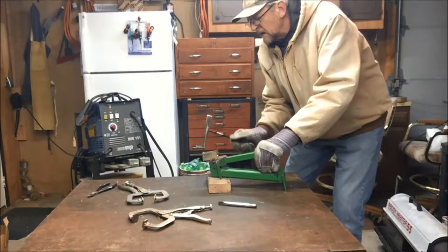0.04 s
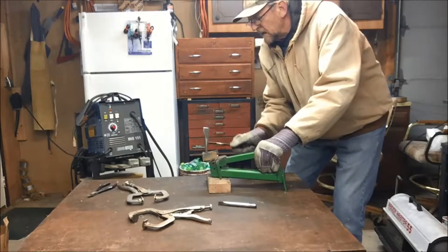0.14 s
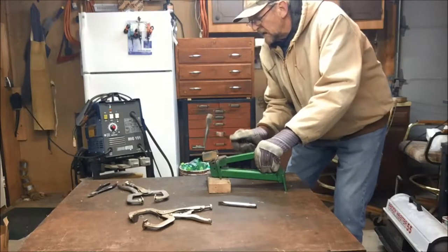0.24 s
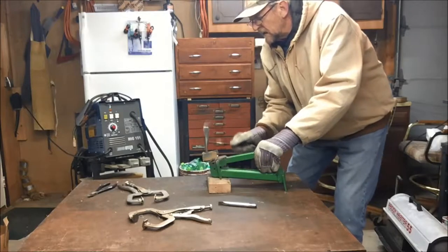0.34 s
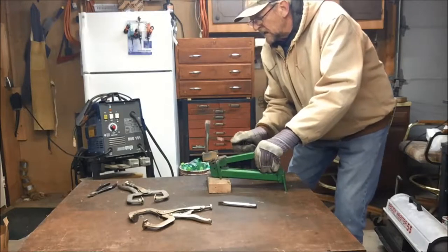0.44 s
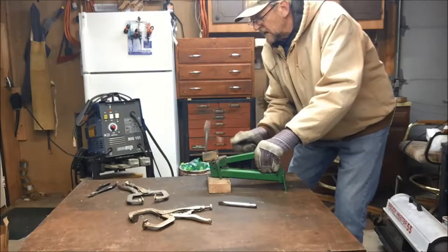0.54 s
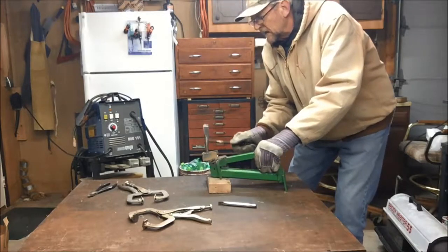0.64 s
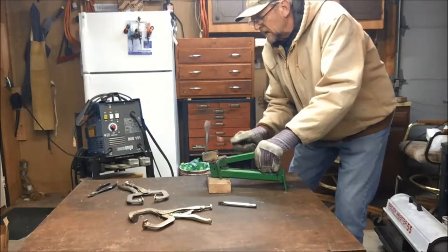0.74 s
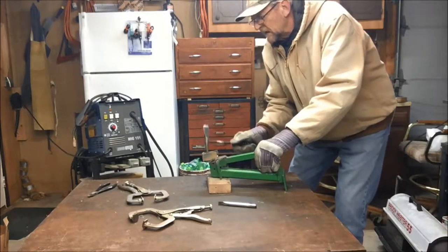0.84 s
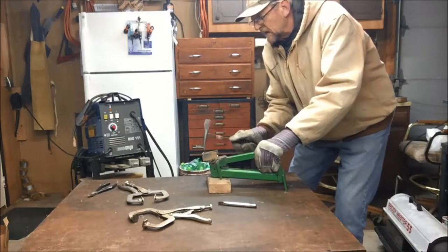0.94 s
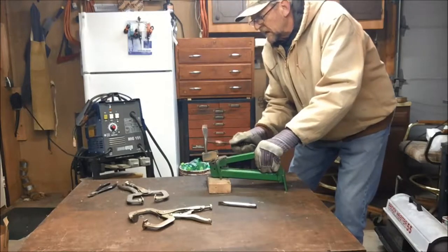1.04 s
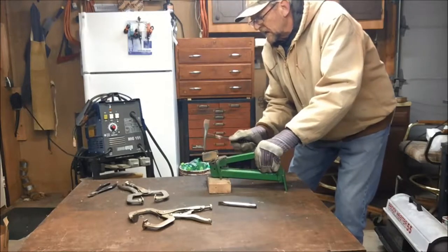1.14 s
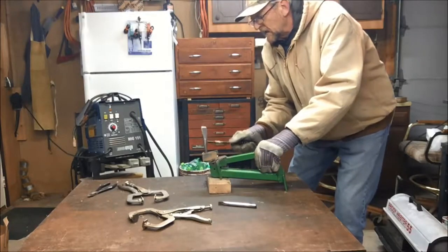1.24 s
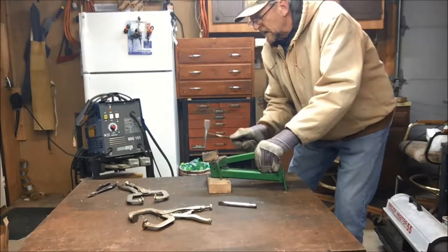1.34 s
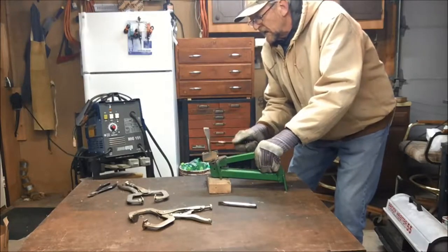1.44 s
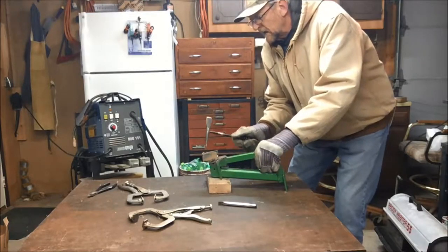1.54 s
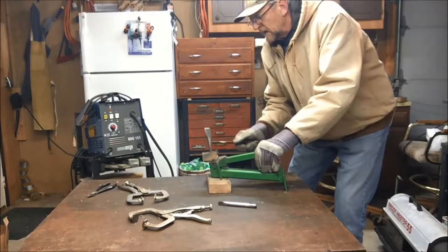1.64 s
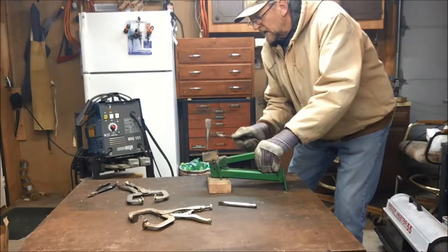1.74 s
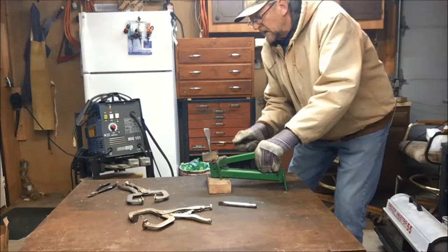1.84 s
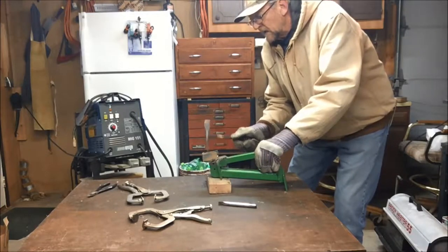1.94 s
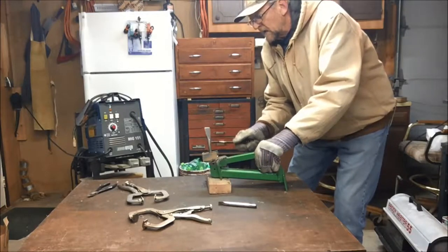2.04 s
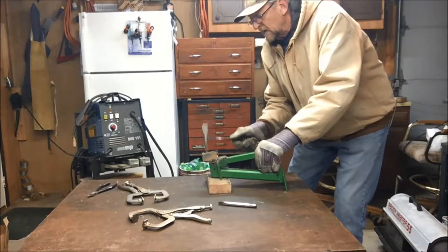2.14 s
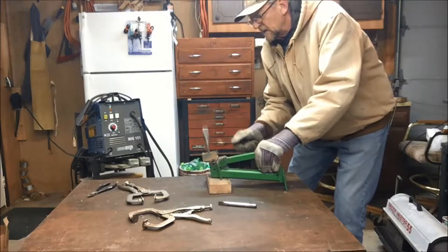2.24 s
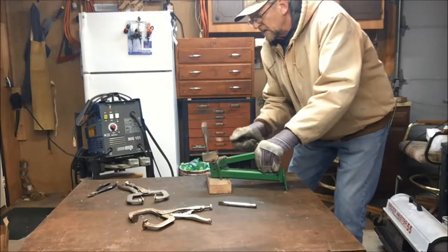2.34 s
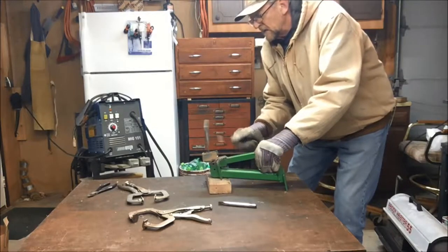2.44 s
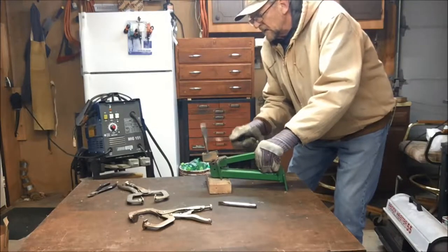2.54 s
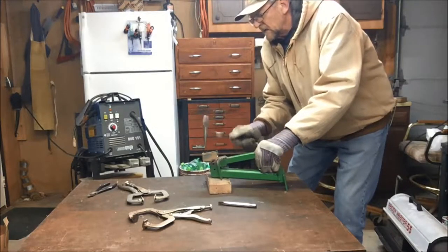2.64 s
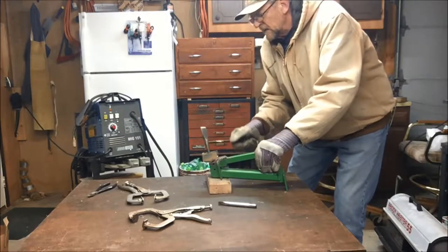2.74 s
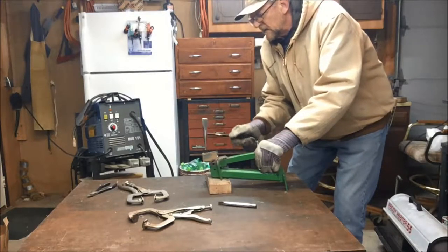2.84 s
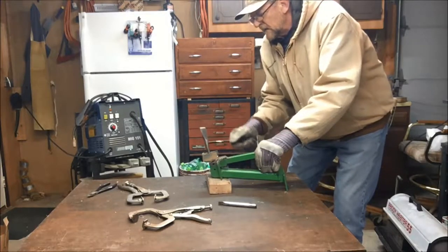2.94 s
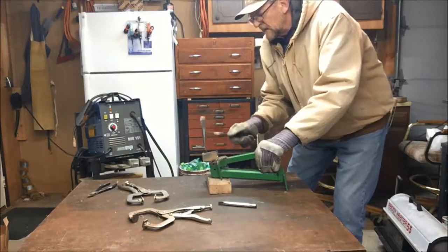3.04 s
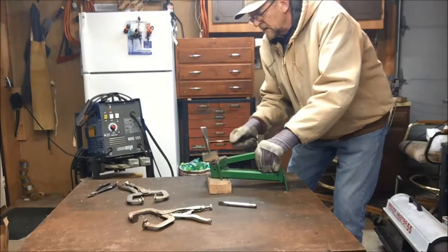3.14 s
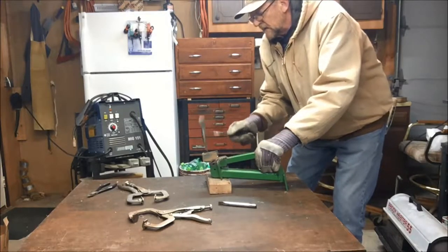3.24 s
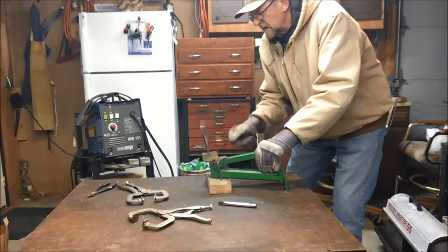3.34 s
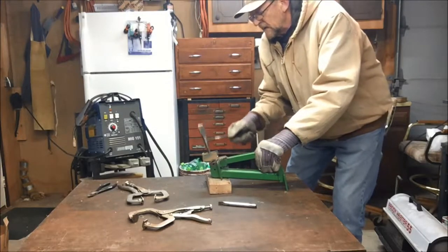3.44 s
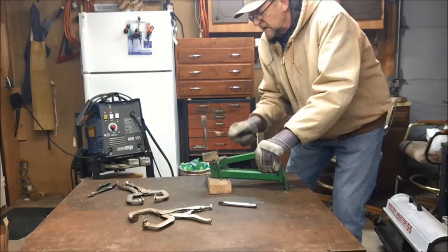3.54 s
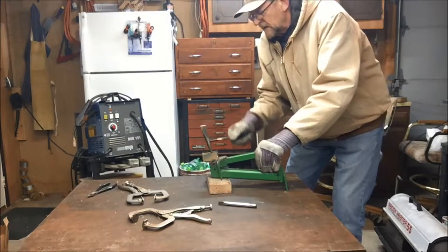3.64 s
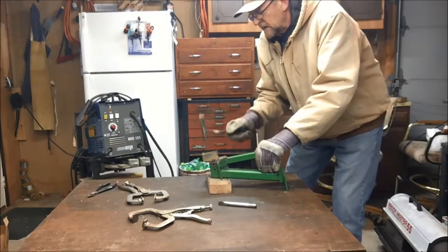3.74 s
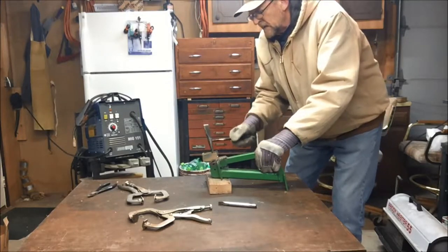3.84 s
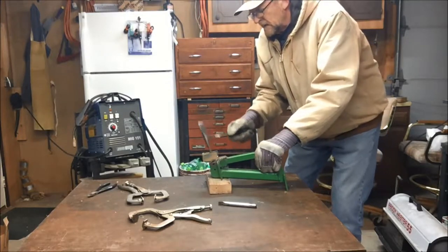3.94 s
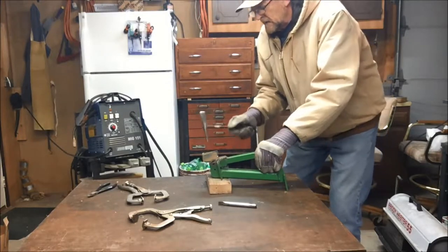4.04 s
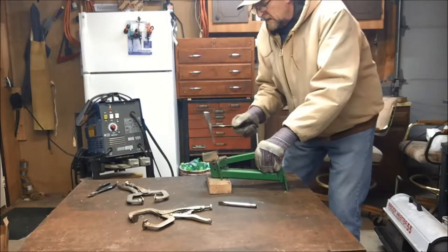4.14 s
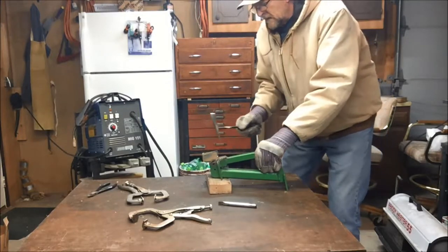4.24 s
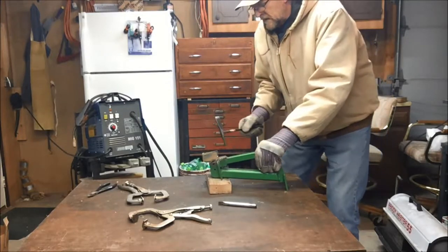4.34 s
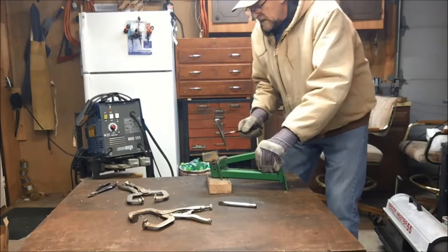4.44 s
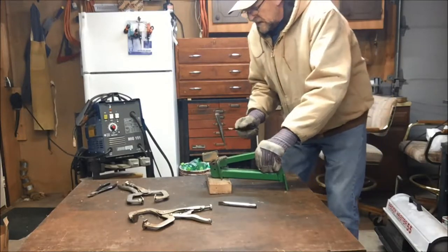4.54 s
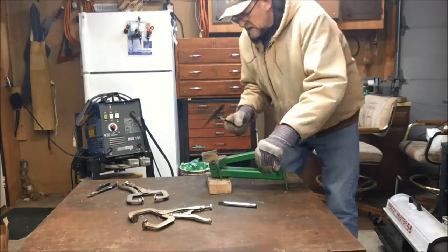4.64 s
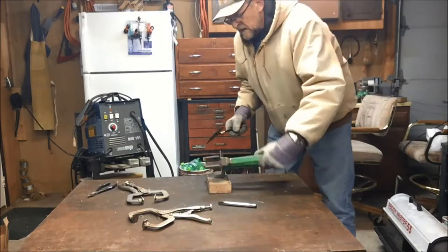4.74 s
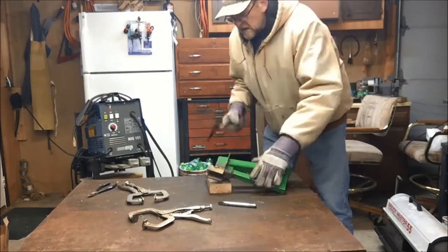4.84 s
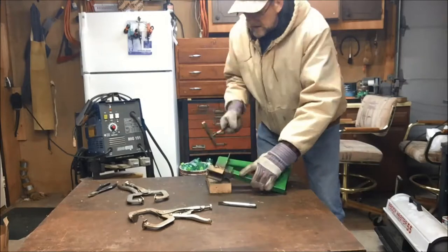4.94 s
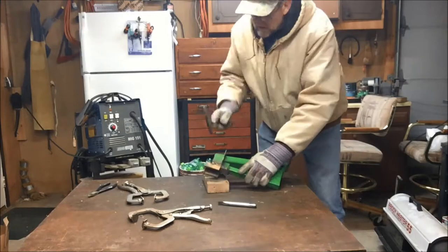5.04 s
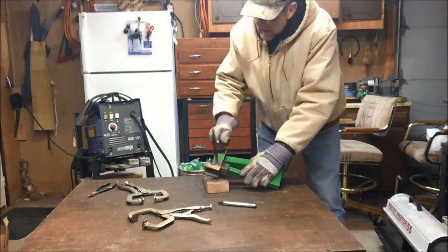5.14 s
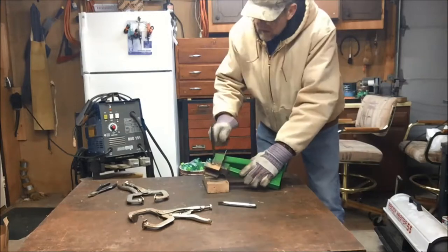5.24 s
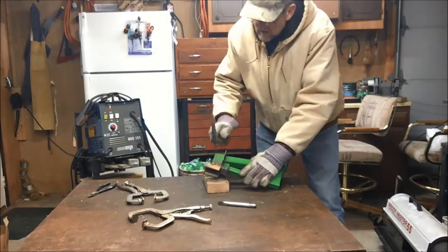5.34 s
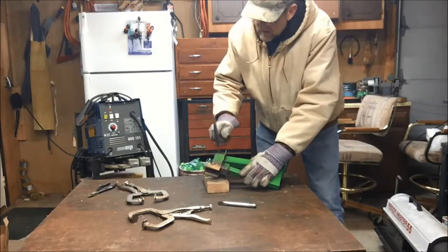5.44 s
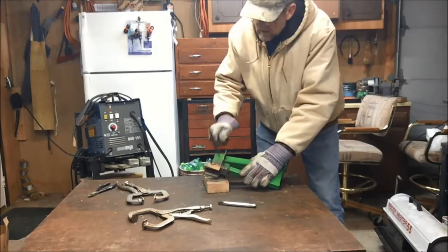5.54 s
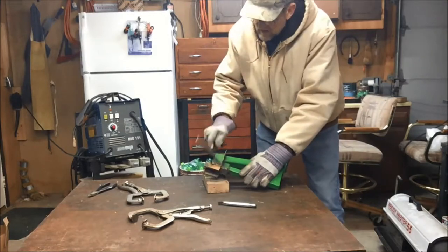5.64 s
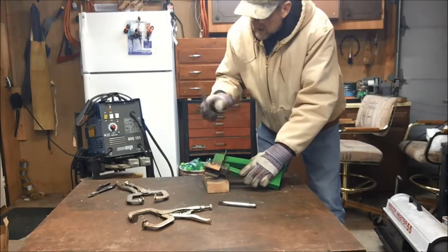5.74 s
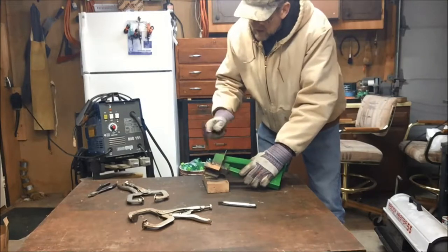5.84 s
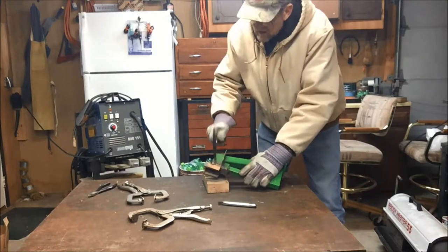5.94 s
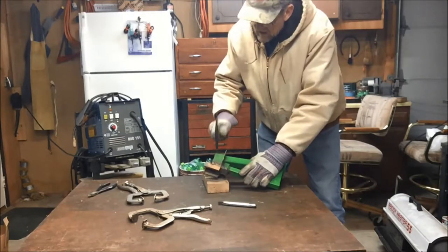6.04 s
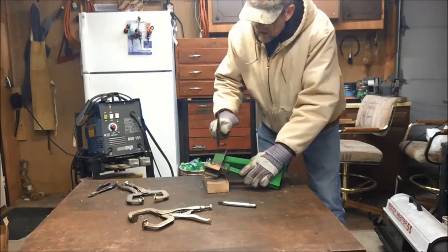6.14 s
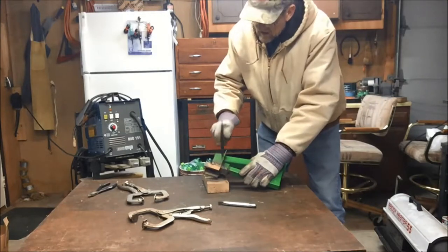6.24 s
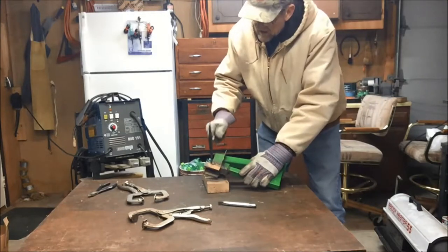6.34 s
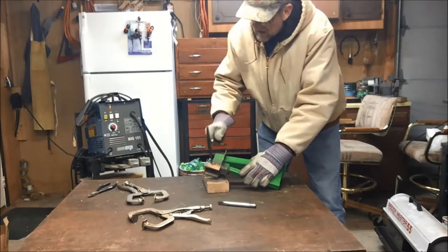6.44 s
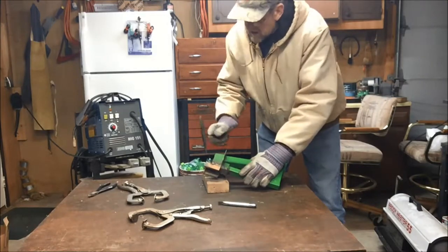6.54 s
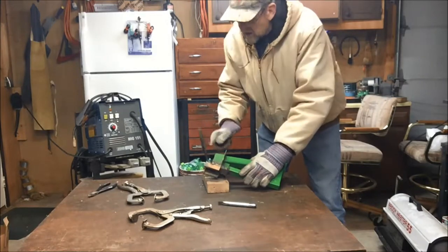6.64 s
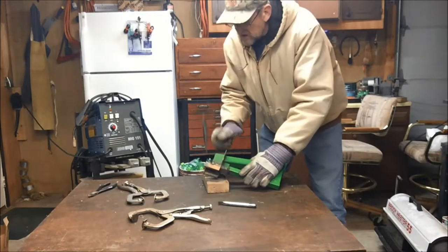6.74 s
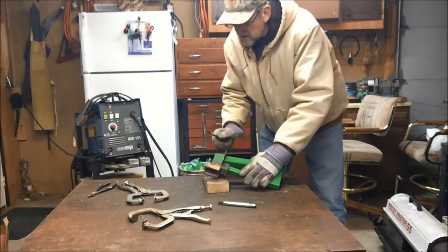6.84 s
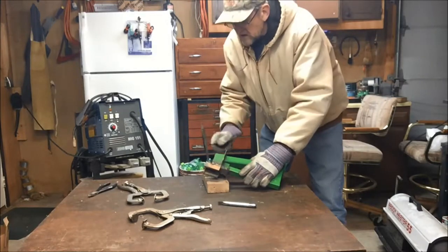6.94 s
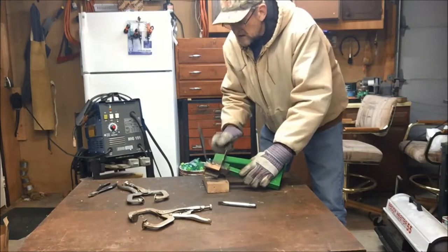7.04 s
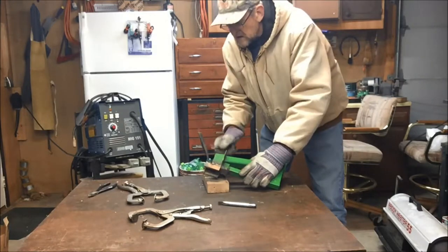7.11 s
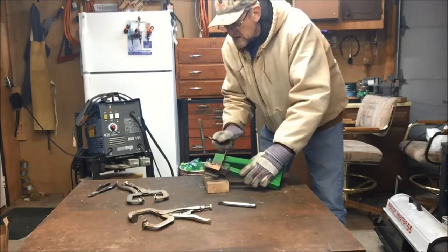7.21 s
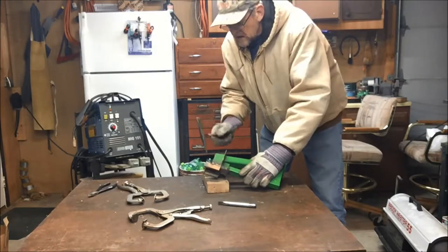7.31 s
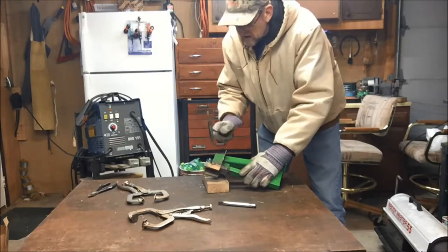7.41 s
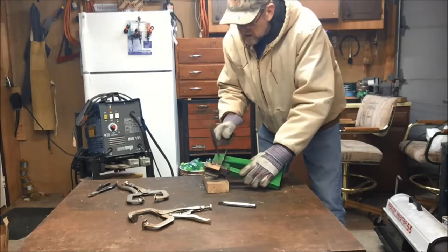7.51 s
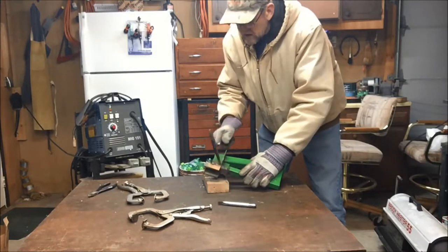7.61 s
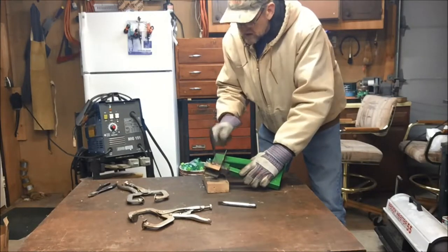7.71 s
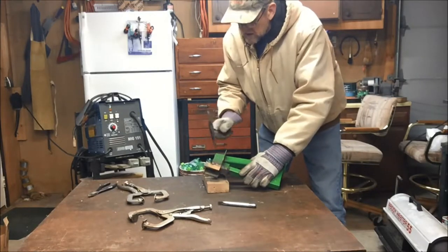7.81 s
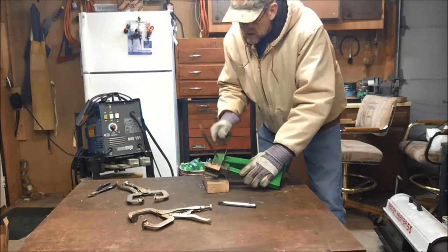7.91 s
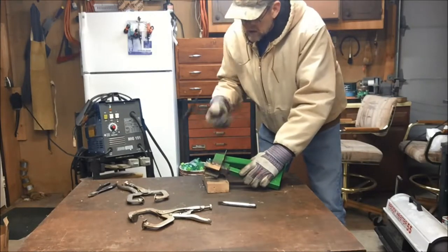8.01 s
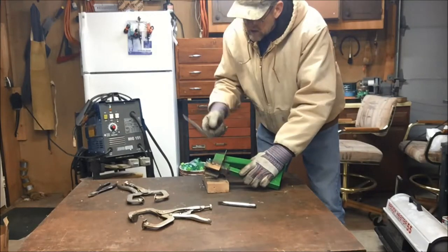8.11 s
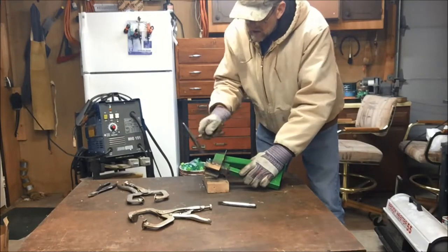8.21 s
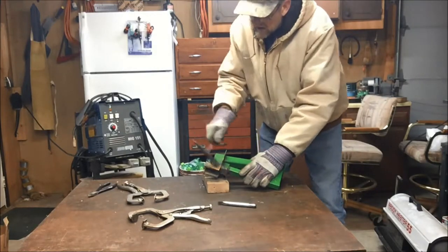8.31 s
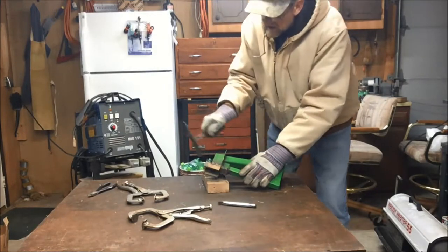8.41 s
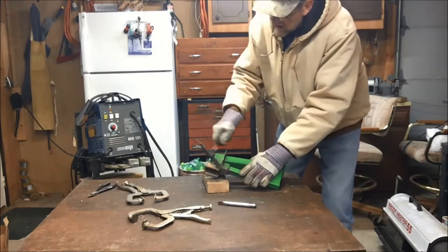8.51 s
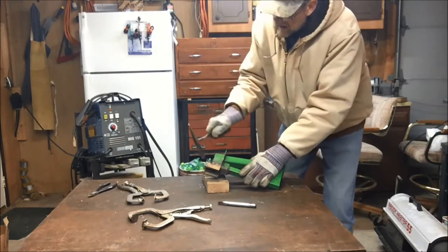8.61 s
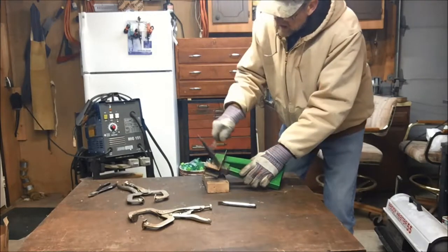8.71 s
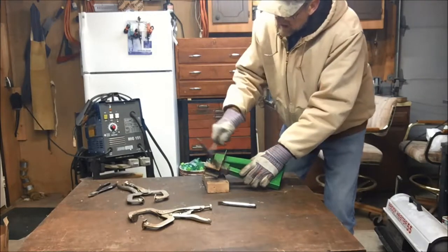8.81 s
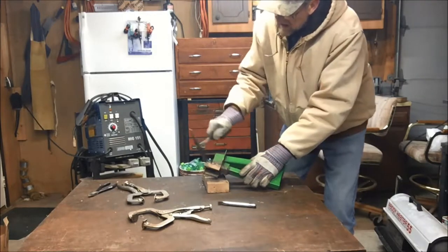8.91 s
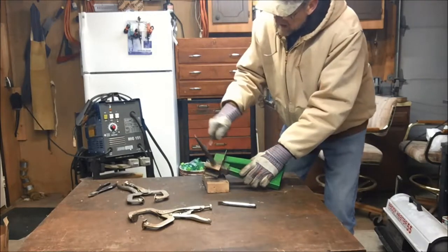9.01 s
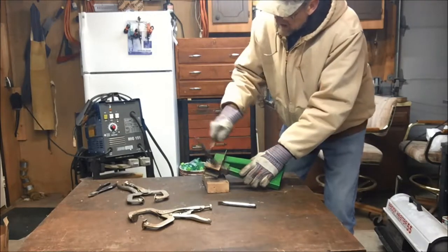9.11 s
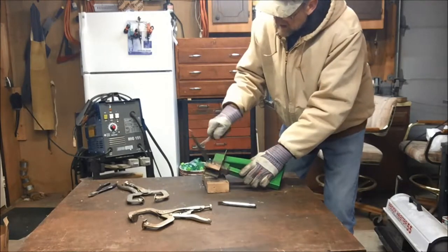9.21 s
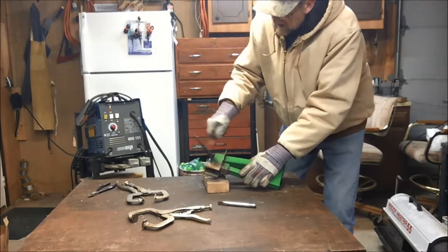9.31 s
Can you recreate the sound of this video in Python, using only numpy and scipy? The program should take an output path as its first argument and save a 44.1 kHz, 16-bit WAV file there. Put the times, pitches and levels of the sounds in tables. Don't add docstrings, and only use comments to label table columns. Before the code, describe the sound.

A home garage heard in mono from a few metres away, with short room echo and a faint low fan hum. From 0 to about 4 s a small chipping hammer hits a welded steel stand lying on a wooden bench, nineteen even blows about 0.2 s apart: gritty crack, boxy wooden thump, short clanking ring and bright tool edge. Blows soften around 1.3-2.4 s, then grow firm; a few begin with a tiny scrape. Only echo and fan remain until 4.65 s, then a very brief silence. From 4.68 s the sound is four times faster and two octaves higher, the fan a higher whirr. Clattering bumps come at 4.7-5.2 s, then tight tinny tapping, about eighteen hits a second: 5.26-5.75, 6.07-6.56, 6.6-7.36 with more ring, 7.5-8.0, and a softer run from 8.36 to 9.35 s.

```python
import sys
import numpy as np
from scipy import signal
from scipy.fft import rfft, irfft
from scipy.io import wavfile
from scipy.ndimage import uniform_filter1d, map_coordinates

SR = 44100
rng = np.random.default_rng(int(sys.argv[2]) if len(sys.argv) > 2 else 0)


def invert_db(x):
    u = np.asarray(x, float) / 20
    return 10 ** u


def output_pcm(signal):
    pcm = np.clip(np.atleast_2d(signal).T, -1, 1) * 32767
    wavfile.write(sys.argv[1], SR, np.round(pcm).astype(np.int16))


N = 413216
NATURAL, FASTER = 1, 4
SLOW_END_S, FAST_START_S = 4.6495, 4.6832
BLOW_S = 0.42

# start_s, force_db, stand_ring_db, head_ring_db, edge_ring_db
SLOW_BLOWS = [(0.001, -2.5, -11.5, -38, -44), (0.233, -5, -18, -37.5, -30), (0.464, -4.5, -16, -37, -16.5),
              (0.683, -2.5, -14, -35, -46), (0.886, -7, -20, -45, -21.5), (1.1, -4.5, -14, -34.5, -23),
              (1.299, -8.5, -22, -46, -30), (1.511, -11.5, -30.5, -41, -26.5),
              (1.725, -9.5, -30, -51, -29.5), (1.947, -6.5, -23.5, -35.5, -27.5),
              (2.155, -11.5, -31, -43, -44), (2.363, -6.5, -22, -58, -39), (2.574, -3, -21, -55, -14.5),
              (2.792, -2.5, -18, -37, -19), (3.012, -2, -18, -40.5, -30), (3.235, -4.5, -22, -32, -18.5),
              (3.461, -2, -20, -31, -16), (3.694, -8, -29.5, -50, -36), (3.941, -3, -30, -31, -29)]
# start_s, force_db, stand_ring_db, head_ring_db, edge_ring_db
GRAZES = [
    (0.2295, -12, -25, -35, -19.5),
    (0.88, -22, -38, -48, -36),
    (1.294, -20, -37, -37.5, -40),
    (3.23, -33, -44, -44, -40),
]
# start_s, bench_top_db, boards_db
GLOVE_PRESS = [
    (0, -20, -16.5),
    (1.5, -23.5, -20),
    (2.3, -18, -17),
    (3.5, -16.5, -20),
    (3.7, -14.5, -13.5),
    (4, -14.5, -13.5),
]

# start_s, force_db, leg_ring_db, brace_ring_db
FIRST_BOUT = [
    (5.264, -8.5, -26, -27),
    (5.318, -11, -32, -46),
    (5.371, -12, -31, -37),
    (5.423, -8.5, -25, -42),
    (5.477, -7, -32, -28),
    (5.531, -10, -36, -36),
    (5.584, -6.5, -26, -24),
    (5.636, -8, -33, -25.5),
    (5.69, -9, -34, -28.5),
    (5.746, -15, -36, -34.5),
]
SECOND_BOUT = [
    (6.065, -10, -27.5, -45),
    (6.12, -8, -27.5, -45),
    (6.174, -8, -25.5, -24),
    (6.23, -8, -29, -27),
    (6.283, -10, -33, -29.5),
    (6.337, -14.5, -42, -32.5),
    (6.391, -8, -31, -27),
    (6.446, -12, -47, -48),
    (6.499, -8.5, -22, -26),
    (6.555, -9.5, -22.5, -24.5),
]
LEG_BOUT = [(6.615, -25, -34.5, -43), (6.679, -15.5, -30.5, -40), (6.749, -13, -24, -45),
            (6.813, -8, -17, -23), (6.873, -8, -22, -46), (6.929, -13, -23.5, -37),
            (6.99, -10.5, -21.5, -33), (7.051, -8, -19, -37), (7.11, -9, -23.5, -40),
            (7.169, -17, -24.5, -49), (7.231, -11, -27, -37), (7.293, -10, -36, -45),
            (7.364, -8.5, -56, -57)]
FOURTH_BOUT = [
    (7.501, -16, -36, -34),
    (7.556, -6.5, -28, -24),
    (7.611, -7.5, -31, -23),
    (7.669, -11.5, -29, -24),
    (7.728, -9, -29, -27),
    (7.784, -8, -28, -26),
    (7.844, -6.5, -27, -27),
    (7.9, -9, -29, -33),
    (7.957, -13.5, -44, -35),
    (8.016, -16.5, -28.5, -32),
]
LAST_BOUT = [(8.357, -14.5, -30.5, -36.5), (8.432, -14.5, -28.5, -34), (8.496, -16, -26.5, -35),
             (8.564, -16, -35, -41), (8.629, -11, -27.5, -34), (8.691, -14.5, -24.5, -32),
             (8.75, -13.5, -28, -38), (8.81, -11.5, -22, -32), (8.867, -14, -27, -33),
             (8.928, -15, -25, -34), (8.989, -15.5, -41, -39), (9.051, -18.5, -39, -35.5),
             (9.113, -14, -29, -35), (9.172, -13, -26.5, -28.5), (9.232, -15, -32, -33.5),
             (9.29, -14, -27, -36), (9.352, -15.5, -32.5, -44)]
# slag_crack_db, bench_thump_db (over the force)
BOUT_RESTING = [
    (-0.5, -6.5),
    (1, -5.5),
    (-2.5, -4.5),
    (0.5, -6),
    (1.5, -5),
]
# start_s, crack_db, bench_db, steel_db
BUMPS = [(4.7245, -36, -29, -55), (4.8598, -20, -19.5, -49), (4.8724, -21.5, -18.5, -45),
         (4.9001, -8, -10, -40), (4.9107, -12, -16, -42), (4.9214, -19, -14.5, -49),
         (4.935, -20, -14.5, -46), (4.9479, -12.5, -9, -41), (4.9614, -19.5, -30, -49),
         (5.1259, -23, -14, -29), (5.1336, -11.5, -8.5, -32), (5.1464, -12.5, -15.5, -43),
         (5.1708, -25, -20.5, -52), (6.6916, -23, -17.5, -32), (7.3545, -30, -10, -32),
         (9.0106, -26, -41, -23), (9.0614, -18, -41, -34)]

BENCH_HZ = [84, 112, 128, 200, 240, 290, 312, 345, 415, 565, 780, 965]
# level_db, t60_s
BENCH_RING = [(-46, 0.031), (-0.5, 0.2), (-1.5, 0.24), (-11.5, 0.61), (-4, 0.19), (0, 0.11), (-6, 0.23),
              (-3.5, 0.14), (-20, 0.12), (-12.5, 0.2), (0.5, 0.045), (-7.5, 0.12)]
STAND_HZ = [1602, 1748, 1810, 2150, 2462, 2580, 2955, 3397, 3566, 3763, 4405, 5200, 5440, 5625]
# level_db, t60_s
STAND_RING = [(3, 0.13), (-4, 0.16), (5.5, 0.028), (21, 0.042), (16, 0.055), (10.5, 0.26), (-4, 0.073),
              (-2.5, 0.064), (0.5, 0.048), (-2, 0.12), (-22, 0.094), (-8.5, 0.061), (-22, 0.11),
              (-27.5, 0.22)]
HAMMER_HZ = [4262, 13030, 6070, 6420, 6860, 7176, 7946, 8900, 9375, 10430, 12100, 13900, 14410]
# level_db, t60_s
HAMMER_RING = [(9, 0.38), (-34, 1), (-5, 0.049), (-6, 0.27), (15.5, 0.028), (-23, 0.18), (-15, 0.27),
               (1.5, 0.17), (-2.5, 0.32), (-6, 0.15), (-1, 0.023), (-20, 0.053), (-35, 0.088)]
TURNED_BENCH_HZ = [100, 114, 128, 285, 316, 338, 503, 555, 628, 992, 1212]
# level_db, t60_s
TURNED_BENCH_RING = [(1.5, 0.09), (-2.5, 0.34), (3.5, 0.22), (-4.5, 0.18), (-2.5, 0.23), (-13, 0.15),
                     (-5, 0.17), (-16, 0.085), (-15.5, 0.26), (-10.5, 0.21), (-37, 0.088)]
LEG_HZ = [1602, 2175, 1715]
# level_db, t60_s
LEG_RING = [(3.5, 0.15), (0.5, 0.14), (-1, 0.094)]
BRACE_HZ = [2572, 1782, 2118, 2460]
# level_db, t60_s
BRACE_RING = [(5.2, 0.19), (9, 0.12), (7.1, 0.2), (1, 0.052)]
PLATE_HZ = [3105, 3400, 3570, 3755]
# level_db, t60_s
PLATE_RING = [(-3, .14), (-1, .13), (-3, .12), (-5, 0.14)]

# pitch_hz, level_db
SLAG_COLOUR = [(30, -14), (70, 0), (160, 2), (330, 0.5), (1000, -7.5), (2500, -17), (4000, -20),
               (8000, -25), (16000, -30)]
# pitch_hz, level_db
THUD_COLOUR = [(30, -32), (70, 5), (150, 0), (400, 0), (1000, -8), (2500, -21), (4000, -30)]
# pitch_hz, level_db (per Hz)
FAN_COLOUR = [(15, -54), (25, -58), (48, -6.5), (120, -4.5), (242, -8), (277, -13.5), (317, -9), (405, -17),
              (911, -27), (3080, -35.5), (3520, -37.5), (4140, -37), (5570, -43), (16000, -56.5)]
# pitch_hz, t60_s
GARAGE_DECAY = [(60, 0.34), (300, 0.26), (1500, 0.31), (4000, 0.3), (8000, .25), (16000, 0.24)]
# pitch_hz, level_db
MICROPHONE = [(10, -8.5), (30, -4), (45, -1), (65, 0), (16000, 3)]

# base_db, then dB per dB of force, stand, head and edge
BRACES_LAW, PLATE_LAW = (8.4, 0.01, 1.344, 0.01, 0.01), (13, 0.56, 0.8, 0.37, -0.18)
NECK_LAW = (-28.5, 0.1, 0.44, 0.45, 0.15)
SHANK_LAW, TIP_LAW = (-22.5, 3.5, -0.16, -0.03, -0.05), (1.6, 1.56, 0.057, 0.16, 0.46)


def along(points, hz):
    f, value = np.transpose(points)
    return np.interp(np.log(hz + 1), np.log(f + 1), value)


def coloured(x, spectrum, speed):
    true_hz = np.fft.rfftfreq(len(x), 1 / SR) / speed
    return irfft(rfft(x) * invert_db(along(spectrum, true_hz)), len(x))


def garage_echo(length, speed):
    hz, t, z = signal.stft(rng.standard_normal(length), SR, nperseg=128)
    t60 = along(GARAGE_DECAY, hz / speed)[:, None]
    tail = signal.istft(z * invert_db(-60 * t * speed / t60), SR, nperseg=128)[1][:length]
    return tail / np.linalg.norm(tail)


def crowd(count, lo_hz, hi_hz, db, t60):
    place, size = rng.uniform(size=(2, count))
    return np.transpose([lo_hz * (hi_hz / lo_hz) ** place, db - 9 * size, t60 * (1.4 - place)])


def ring(modes, t, scatter_db, rise, rough):
    hz, db, t60 = np.transpose(modes)[:, :, None]
    luck = rng.standard_normal((len(modes), 2))

    knot = t * 90
    whole = knot.astype(int)
    drift = rng.standard_normal((len(modes), 60))
    waver = drift[:, whole] + (drift[:, whole + 1] - drift[:, whole]) * (knot - whole)

    detuned_hz = hz * (1 + luck[:, 1:] / 700)
    tone = np.sin(2 * np.pi * detuned_hz * t + rough * waver)
    tone *= (-1) ** np.arange(len(modes))[:, None]
    decay = invert_db(db + scatter_db * luck[:, :1] - 60 * t / t60)
    contact = 1 + 0.8 * np.exp(-t / (15 * rise))
    return (decay * tone).sum(0) * (1 - np.exp(-t / rise)) * contact


def first_reflection(length, speed):
    delay = round(0.004 * SR / speed)
    return np.pad(garage_echo(length, speed), (delay, 0))[:length]


def slag_crack(t, speed, spectrum, wet_db):
    burst = rng.standard_normal(len(t)) * invert_db(-60 * t / 0.06)
    burst = burst / np.linalg.norm(burst)
    noise = coloured(burst + invert_db(wet_db) * first_reflection(len(t), speed), spectrum, speed)
    return noise * (1 - np.exp(-t / 0.00064))


def hammering(rows, parts, speed, crack=None):
    t = np.arange(int(BLOW_S * SR / speed)) / SR * speed
    fade = np.clip((BLOW_S - t) / 0.08, 0, 1)
    out = np.zeros(N + len(t))
    lasting = first_reflection(len(t), speed)
    for start_s, *levels in rows:
        heard = []
        if crack:
            spectrum, trim_db, wet_db = crack
            heard.append((slag_crack(t, speed, spectrum, wet_db), trim_db))
        tail = 0.6 * lasting + 0.8 * first_reflection(len(t), speed)
        for modes, trim_db, wet_db, rise, rough in parts:
            direct = ring(modes, t, 2.2, rise, rough)
            room = signal.fftconvolve(direct, tail)[:len(t)]
            heard.append((direct + invert_db(wet_db) * room, trim_db))
        start = round(start_s * SR)
        for (x, trim_db), db in zip(heard, levels):
            out[start:][:len(t)] += invert_db(db + trim_db) * fade * x / np.abs(x).max()
    return out[:N]


def shared_force(rows, bench_db, plate_db):
    s, force, stand, head, edge = np.transpose(rows)

    def law(rule):
        return rule[0] + np.dot(rule[1:], [force, stand, head, edge])

    when, top_db, boards_db = np.transpose(GLOVE_PRESS)
    thump = 0.13 * force + bench_db
    top = thump + np.interp(s, when, top_db)
    boards = thump + np.interp(s, when, boards_db)
    low = np.c_[s, force, top, boards, stand, law(BRACES_LAW)]
    high = np.c_[s, law(PLATE_LAW) + plate_db, head, law(NECK_LAW), edge, law(SHANK_LAW), law(TIP_LAW)]
    return low, high


def slow_blows():
    glanced = [any(0 < s - g < 0.02 for g, *_ in GRAZES) for s, *_ in SLOW_BLOWS]
    full_low, full_high = shared_force(SLOW_BLOWS, bench_db=-1.5 * np.array(glanced), plate_db=0)
    light_low, light_high = shared_force(GRAZES, bench_db=-13, plate_db=10)
    return np.r_[full_low, light_low], np.r_[full_high, light_high]


def flat_stand():
    bench = np.c_[BENCH_HZ, BENCH_RING]
    stand = np.c_[STAND_HZ, STAND_RING]
    tool = np.c_[HAMMER_HZ, HAMMER_RING]
    braces = np.r_[stand[3:6], crowd(count=8, lo_hz=1100, hi_hz=2900, db=-9, t60=0.16)]
    plate = np.r_[stand[6:], crowd(count=14, lo_hz=2800, hi_hz=7500, db=-8, t60=0.16)]
    low = [(bench[:3], 1.5, -7, 0.008, 0.3),
           (bench[3:], 1.5, -2.5, 0.004, 0.5),
           (stand[:3], 1.5, -1.5, 0.0008, 0.6),
           (braces, 1.5, -1.5, 0.0008, 0.6)]
    high = [(plate, -3, -1.5, 0.0008, 0.6),
            (tool[:1], 5.5, -12, 0.0004, 0.15),
            (tool[1:2], 5.5, -12, 0.0004, 0.2),
            (tool[2:7], -1.5, 1.5, 0.0006, 0.8),
            (tool[7:10], -1.5, -1.5, 0.0006, 0.5),
            (tool[10:], -1.5, 1.5, 0.0006, 0.8)]
    deep, bright = slow_blows()
    return hammering(deep, low, NATURAL, crack=(SLAG_COLOUR, -7, 3)) + hammering(bright, high, NATURAL)


def fan(speed, db, hum_db):
    air = coloured(rng.standard_normal(N), FAN_COLOUR, speed)
    t = np.arange(N) / SR * speed
    sway = map_coordinates(rng.standard_normal(int(t[-1] * 6) + 4), [t * 6])
    hum = invert_db(hum_db + 4.6 * sway) * np.sin(2 * np.pi * 120 * t)
    return invert_db(db) * air / air.std() + hum


def starved(x, above_hz, under_db):
    hz, _, z = signal.stft(x, SR, nperseg=1024)
    power = uniform_filter1d(np.abs(z) ** 2, size=10, axis=0)
    power = uniform_filter1d(power, size=3, axis=1)
    loud = np.abs(uniform_filter1d(power.sum(0), size=13, origin=6))
    faint = (power < loud * invert_db(under_db) ** 2) & (hz[:, None] > above_hz)
    return signal.istft(z * ~faint, SR, nperseg=1024)[1][:N]


def fast_blows():
    rows = []
    bouts = [FIRST_BOUT, SECOND_BOUT, LEG_BOUT, FOURTH_BOUT, LAST_BOUT]
    for bout, (slag_db, thump_db) in zip(bouts, BOUT_RESTING):
        s, force, leg, brace = np.transpose(bout)
        plate = 1.44 * brace + 18
        rows += list(np.c_[s, force + slag_db, force + thump_db, leg + 9, brace + 10.5, plate])
    return rows


def turned_stand():
    bench = np.r_[np.c_[TURNED_BENCH_HZ, TURNED_BENCH_RING],
                  crowd(count=14, lo_hz=140, hi_hz=1300, db=-10, t60=0.12)]
    loose = np.r_[bench[:3], crowd(count=24, lo_hz=90, hi_hz=800, db=-5, t60=0.13)]
    leg = np.r_[np.c_[LEG_HZ, LEG_RING], crowd(count=8, lo_hz=1850, hi_hz=3900, db=-15, t60=0.14)]
    steel = [(leg, 1.5, -5, 0.0008, 0.6),
             (np.c_[BRACE_HZ, BRACE_RING], 2.5, -1.5, 0.0008, 0.6),
             (np.c_[PLATE_HZ, PLATE_RING], -1.5, -1.5, 0.0008, 1.1)]
    struck = [(bench, 2.5, -4, 0.008, 0.25)] + steel
    bumped = [(loose, -1.5, 1.5, 0.008, 0.6)] + steel
    blows = hammering(fast_blows(), struck, FASTER, crack=(SLAG_COLOUR, -4, 3))
    knocks = [(s, crack, thump, db, db - 2, db - 11) for s, crack, thump, db in BUMPS]
    return blows + hammering(knocks, bumped, FASTER, crack=(THUD_COLOUR, -1.5, 4))


def scene():
    t = np.arange(N) / SR
    slow = coloured(flat_stand() + fan(NATURAL, db=-39, hum_db=-48.5), MICROPHONE, NATURAL)
    slow = starved(slow, above_hz=12500, under_db=-65)
    fast = coloured(turned_stand() + fan(FASTER, db=-38, hum_db=-45), MICROPHONE, FASTER)
    return (slow * (t < SLOW_END_S) + fast * (t > FAST_START_S))[None]


def low_pass(x):
    return signal.sosfilt(signal.butter(12, 16810, fs=SR, output="sos"), x)


def record(dry):
    held = dry / (1 + np.abs(dry / 0.97) ** 8) ** (1 / 8)
    hz = np.fft.rfftfreq(N, 1 / SR)
    rolloff_db = -np.clip(hz - 15640, 0, None) * 0.04
    finished = irfft(rfft(held) * invert_db(rolloff_db), N)
    return low_pass(finished)


dry = scene()
out = record(dry)
output_pcm(out)
```